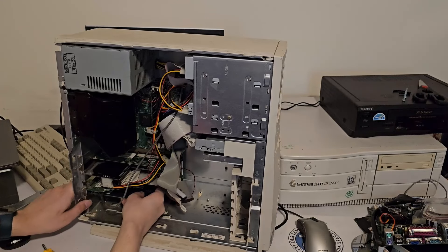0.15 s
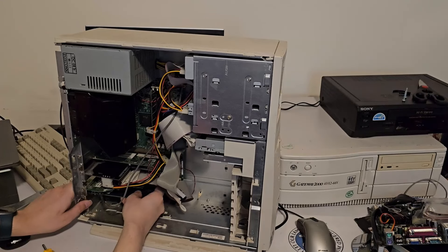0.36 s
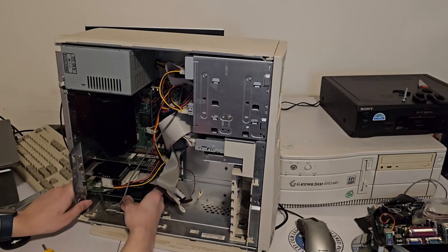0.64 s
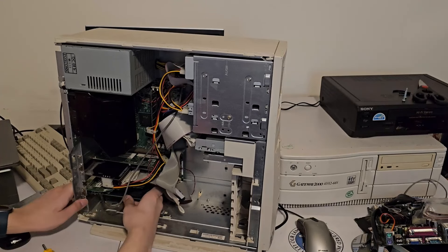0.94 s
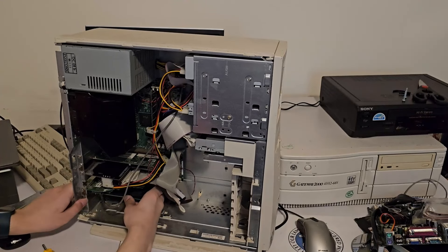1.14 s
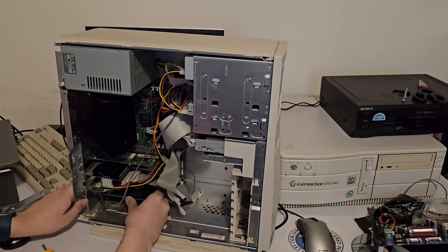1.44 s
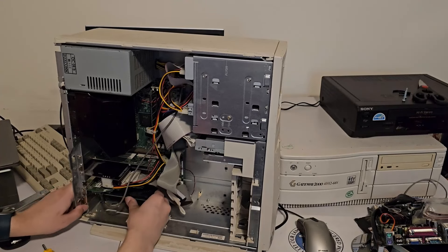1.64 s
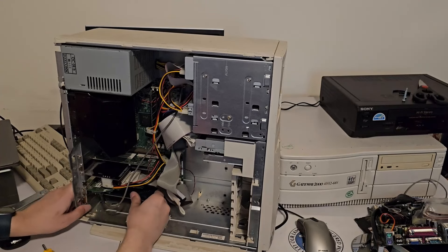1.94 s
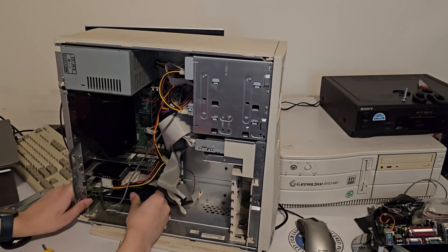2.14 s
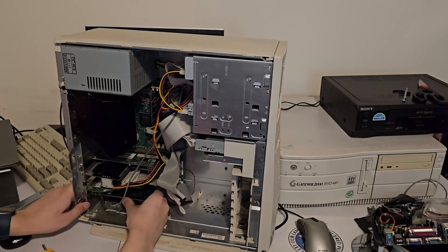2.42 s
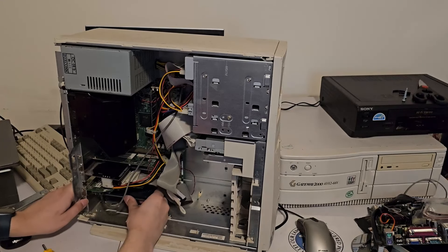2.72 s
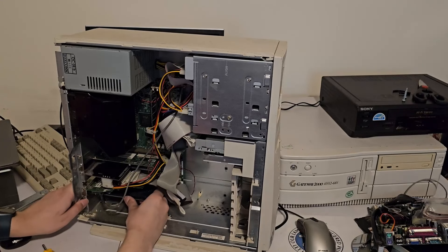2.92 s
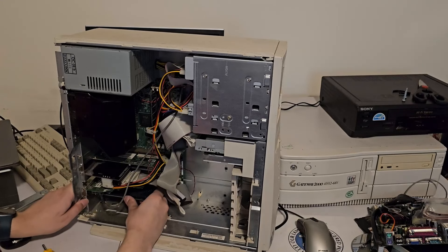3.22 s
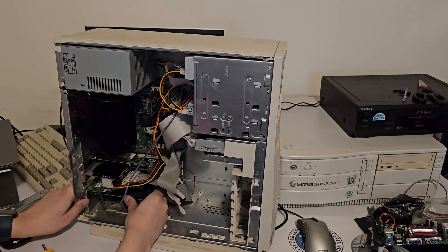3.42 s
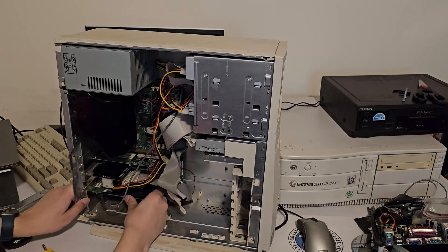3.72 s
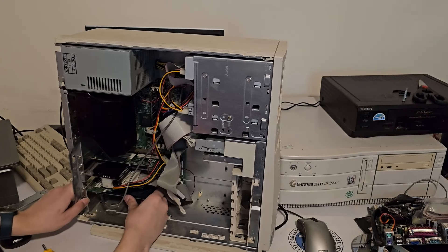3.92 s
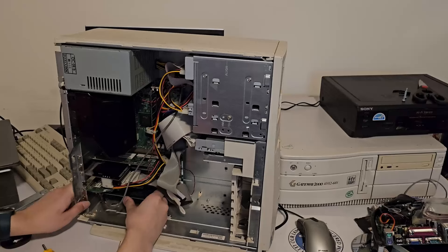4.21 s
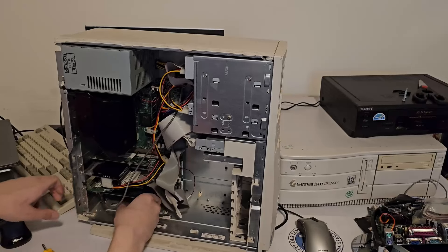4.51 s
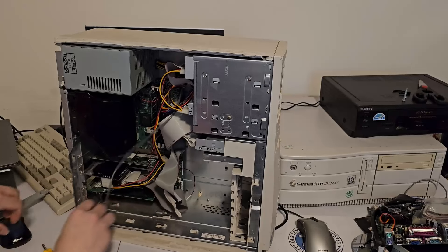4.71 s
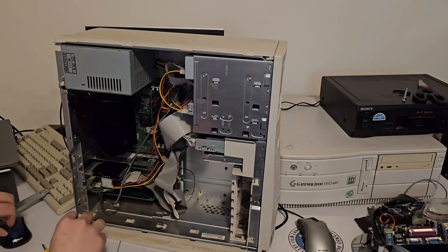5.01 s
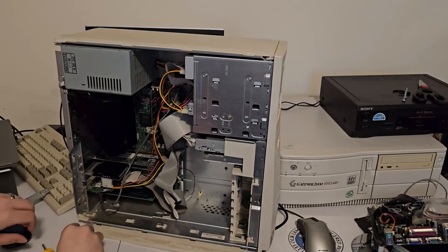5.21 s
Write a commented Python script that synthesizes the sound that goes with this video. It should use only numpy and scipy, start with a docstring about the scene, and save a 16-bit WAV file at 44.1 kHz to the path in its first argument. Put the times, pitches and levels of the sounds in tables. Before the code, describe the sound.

A faint, low room rumble runs throughout, heard in stereo with little echo. At the start a brief soft hiss fades, and a hand rubs and lightly taps an open steel computer case while working an expansion card into place. At about 0.9 seconds the card's metal bracket slips and knocks on the slot frame, with a short ringing clatter of panels and a faint low shudder of the desk. Quiet scuffs of skin and cloth and small ticks follow. The loudest, sharpest knock comes at about 2 seconds, then more faint ticks, a light click at 3.3 seconds and a third hard knock at 3.6 seconds. Between 4.1 and 4.8 seconds there is a cluster of light metallic taps and rubs. At about 5.2 seconds a hollow plastic thing is set down on the desk and rocks with a quick little rattle.

```python
"""A hand works an expansion card into an open steel computer case, heard by two microphones.
A brief hiss fades over a low room rumble; then skin and cloth rub and light taps ring the steel.
At about 0.9, 2 and 3.6 seconds the card's bracket slips and knocks on the slot frame: it bounces,
the panels ring and clatter, and the desk shudders. More rubs and taps follow.
At 5.2 seconds a hollow plastic thing is set down on the desk and rocks."""
import sys
import numpy as np
from scipy import signal
from scipy.fft import rfft, irfft, next_fast_len
from scipy.io import wavfile
from scipy.ndimage import uniform_filter1d

SR = 44100
rng = np.random.default_rng(int(sys.argv[2]) if len(sys.argv) > 2 else 0)


def transcribe(u):
    """Save the signal u as a 16-bit wav file named by the first command-line argument.

    u: samples, shape (n,) or (channels, n), limited to [-1, 1]; the rate is SR.
    q: integer samples, one column per channel.
    """
    v = np.clip(np.atleast_2d(u).T, -1, 1)
    q = np.round(v * 32767).astype(np.int16)
    wavfile.write(sys.argv[1], SR, q)


N = 236067

# Tone colour of the still room: pitch_hz, level_db
RUMBLE_COLOUR = [(12, -8), (30, 0.5), (45, 3), (80, -11.5), (120, -6), (170, -15.5), (240, -12),
                 (310, -25.5), (500, -25), (700, -31), (2000, -32.5), (5200, -36.5), (6300, -45.5),
                 (10000, -53.5), (12500, -49), (16000, -52)]
# A brief fading hiss at the very start, then strokes of skin and cloth:
# peak_s, fall_by_20_db_s, hiss_db, coarse_over_fine_hiss_db, scuff_db
HISS_AND_STROKES = [(0, .03, -77, 7, -65), (.14, .06, -102, 2.5, -69), (.39, 0.18, -71, -6, -93),
                    (0.737, 0.08, -74, 7, -77), (1.276, 0.0949, -60.5, -2.5, -63),
                    (1.438, 0.18, -77.5, -1, -75), (1.557, 0.05, -71, -10, -77),
                    (1.682, 0.05, -71.5, -13, -74.5), (2.17, 0.06, -75.5, 2, -64.5),
                    (2.328, 0.09, -76.5, -5, -80), (2.626, 0.06, -83.5, 5, -80), (2.736, 0.05, -75, 7, -88),
                    (2.898, 0, -85, 5, -82), (3.42, 0.03, -97, 3, -64.5), (3.523, .06, -78, .7, -60.5),
                    (3.878, 0.12, -92, .7, -76.5), (4.205, 0.06, -69, -3, -68),
                    (4.359, 0.08, -61.5, -1.5, -57.5), (4.44, 0.0632, -62, 0.5, -66.5),
                    (4.589, 0.03, -73, -4, -71)]
# Tone colour of skin on metal: pitch_hz, level_db
SKIN_COLOUR = [(1470, -22.5), (2500, -3), (2710, -9), (4590, 3.5), (5960, -1), (8300, 1), (15100, -8),
               (16100, -9.5), (16500, -17)]
# Tone colour of scuffing cloth: pitch_hz, level_db
CLOTH_COLOUR = [(120, -30), (200, -0.5), (420, -13), (534, -1.5), (624, -7), (678, -5), (3500, -24),
                (4550, -35.5), (7700, -120)]
# The five pitch bands of a blow, named body, boom, clack, snap and tick: low_hz, high_hz
BLOW_BANDS = [(400, 1600), (120, 400), (1600, 5500), (5500, 10000), (10000, 17500)]
# Light taps, and the dull low ring swelling again after two hard knocks: start_s, body_db,
# boom_over_body_db, clack_over_body_db, tick_over_body_db, slip_ms, favoured_hz, lift_db
TAPS_AND_SWELLS = [(.013, -62.5, -22, 2, -30, 5.7, 990, 4.5), (.091, -53, -12.5, 4, -26, 1.6, 890, 7.3),
                   (.268, -58, -12, 12, 6.5, 2.05, 1930, 2.5), (.591, -67.5, -19, -18, -32, 2, 1000, 6),
                   (.713, -66, -8, -1, -22, 5.6, 1707, 12), (.843, -59, -16, -34.5, -51, 4.7, 910, 8),
                   (0.867, -53, -7, -22, -48, 9.4, 910, 8), (.885, -54, -8, -12, -22, 16, 910, 6.8),
                   (.943, -47, 7, -25, -28, 3.3, 244, 5.7), (1.04, -62.5, 6, -19, -35, 7.4, 357, 7.7),
                   (1.277, -59.5, -5.5, 5, -12, 2.3, 696, 16), (1.542, -73, -6, -16, -23, 6.1, 865, 4),
                   (1.742, -67.5, -11.5, -6, -35, 4.2, 1210, 23), (2.192, -66, 9, -.7, -26, 6, 245, 12),
                   (2.228, -69.5, 11, -12, -17, 4.3, 244, 13), (2.311, -65, -16, -8.5, -21, 6, 750, 16),
                   (2.498, -68.5, -12, -16, -33, 6, 924, 7.5), (2.622, -68, -10, -3.5, -34, 5.2, 1398, 23),
                   (2.727, -75.5, -2, 5.5, -9, 3.4, 1293, 12), (2.899, -62, -2, -1, -34, 0.59, 1680, 18),
                   (3.336, -52.5, -15, 6.5, -11.5, 2.3, 761, 3.9),
                   (3.513, -61.5, -10, 3.5, -20.5, 12.7, 761, 3), (3.628, -48, 10, -18, -19, 8.8, 244, 9),
                   (4.136, -61.5, -10, -7.5, -28, 0.84, 990, 8.5),
                   (4.202, -56, -15, -6.5, -12, 1.14, 670, 2.6), (4.223, -59.5, -2.5, -18, -23, 3, 670, 3),
                   (4.322, -55, -11, -6.5, -23, 0.75, 670, 3), (4.441, -59.5, -12, -7, -7, 1.6, 750, 6),
                   (4.497, -59, -1.5, -15, -17, 1.2, 760, 7.7),
                   (4.73, -55.5, -6.5, 2, -17, 1.95, 582, 12.5)]
# Modes (natural tones) of the case: pitch_hz, level_db, ring_s (always the time to fade by 60 dB)
CASE_MODES = [(133, -5, 0.17), (199, 0.5, .22), (244.2, 1.5, .15), (287, -9, 0.16), (352, -2, 0.11),
              (406, -9, 0.017), (516, 2.5, .15), (582, -6.5, 0.22), (671, -3, 0.13), (746.4, 1, 0.11),
              (880, -6, 0.12), (904, 1.5, 0.062), (984, 0, 0.12), (1193.5, -9, 0.03), (1302, -8, 0.072),
              (1376, -12, .08), (1485, -8, 0.15), (1690, -5.5, 0.061), (1922, -0.5, 0.13),
              (2111, 1.5, 0.062), (2723, -7.5, 0.035), (3660, -2, 0.066), (4080, -3, 0.069),
              (4700, -5, 0.06), (5260, -3, 0.051), (5520, -1.5, 0.051)]
# Modes too crowded to tell apart, in body and boom: level_over_clear_modes_db, ring_s
CROWDED_MODES = [(-0.5, 0.069), (-5, 0.16)]
# Toneless clatter in clack, snap and tick: sheet_ring_s, room_ring_s, room_share_db
CLATTER_FADES = [(0.048, 0.2, -4), (0.014, 0.24, -2.5), (.02, .17, -4.5)]
# Tone colour of that clatter: pitch_hz, level_db
CLATTER_COLOUR = [(820, -32), (1400, 5.5), (1790, -6), (2100, 1.5), (2450, -6), (2690, -1), (4080, 0),
                  (5010, -3), (5430, -6.5), (6730, -11.5), (8080, -6.5), (10400, -18), (11400, -14.5),
                  (16000, -16.5)]
# Shudders of the desk: start_s, level_db, pitch_hz, ring_s
DESK_SHUDDERS = [(.03, -51, 38.3, 0.96), (0.959, -48.5, 44.13, 1), (2.03, -51, 41.5, 1),
                 (3.639, -50.5, 40, 0.86)]
# Hard knocks of the bracket: start_s, body_db, boom_over_body_db, clack_over_body_db,
# tick_over_body_db, strongest_at_ms, favoured_hz
BRACKET_KNOCKS = [(0.9044, -34.5, -4.5, -1.5, -5.5, 7.4, 244), (1.9623, -25.5, -12.5, 3.5, -2.5, 4.45, 361),
                  (3.581, -29.5, -1.4, -0.5, 2, 7.7, 244)]
# Bounces within a hard knock, ever further apart: delay_ms
BOUNCES_MS = (0, 3.8, 8.7, 15.5, 24)
# The rocking plastic thing touches the desk: start_s, body_db
PLASTIC_TOUCHES = [(5.2205, -59.5), (5.236, -49), (5.248, -45), (5.257, -44), (5.268, -55.5), (5.29, -61)]
# Modes of the plastic thing: pitch_hz, level_db, ring_s
PLASTIC_MODES = [(181, -5, 0.081), (613, -5, 0.12), (676, -1.5, 0.059), (840, -16.5, 0.053),
                 (910, -4, 0.051), (1220, -4, .04), (2095, 10.5, 0.064), (2580, -2, 0.18), (4080, -18, .03)]
# Its balance of bands: boom_over_body_db, clack_over_body_db, tick_over_body_db
PLASTIC_BALANCE = (-21, -4, -32.5)
# How long the room echoes: pitch_hz, ring_s
ROOM_RING = [(100, .28), (300, .2), (1000, .22), (3000, .24)]
# How alike the two microphones hear spread-out sound: pitch_hz, likeness (1 is identical)
LIKENESS = [(60, 0.91), (300, 0.43), (700, 0.23), (1500, 0.27), (3000, 0.13), (12000, 0.011)]
# How much louder the left microphone is: pitch_hz, left_over_right_db
LEFT_TILT = [(100, 1.0), (1000, 1.0), (2000, -.5), (4000, 1.0), (8000, 2.2), (12500, 6.5)]

KNOCK_PING_DB, LIGHT_PING_DB = -13, -7  # clear modes within the clack of hard and of light blows


def gain_of(db):
    """Turns decibels into a factor to multiply by."""
    return 10 ** (np.asarray(db) / 20)


def evened(x):
    """Scales a signal to an average power of 1."""
    return x / np.sqrt(np.mean(x ** 2) + 1e-20)


def read(points, hz):
    """Looks up a table at any pitch, gliding between its rows."""
    pitches, values = np.transpose(points)
    return np.interp(np.log(hz + 1), np.log(pitches + 1), values)


def add(mix, start_s, sound):
    """Adds a sound to the mix at its start time."""
    part = mix[round(start_s * SR):][:len(sound)]
    part += sound[:len(part)]


def wobble(samples):
    """A random drift; more samples make it slower."""
    return evened(uniform_filter1d(rng.standard_normal(N), size=samples))


def partly_alike(left, other, hz):
    """Makes a left and right pair of spectra, most alike in the bass."""
    same = read(LIKENESS, hz)[:, None]
    return np.array([left, same * left + np.sqrt(1 - same ** 2) * other])


def noise(colour, patchy_db, size):
    """Left and right noise of a given tone colour, with drifting louder and softer patches."""
    frames, hz = 4 * N // size + 5, np.fft.rfftfreq(size, 1 / SR)
    a, b, c, d, patches = rng.standard_normal((frames, len(hz), 5)).T
    patches = uniform_filter1d(patches, size=size // 64, axis=0)  # smooth over pitch
    patches = evened(uniform_filter1d(patches, size=6, axis=1))  # and over time
    spectra = partly_alike(a + 1j * b, c + 1j * d, hz)
    spectra *= gain_of(read(colour, hz)[:, None] + patchy_db * patches)
    return evened(signal.istft(spectra, nperseg=size, noverlap=3 * size // 4)[1][:, :N])


def room_rumble():
    """The still room makes a faint, low noise throughout."""
    return gain_of(-64.5) * noise(RUMBLE_COLOUR, patchy_db=1.5, size=2048)


def hiss_and_rubs():
    """A brief hiss fades; then with each stroke skin hisses on metal and cloth adds a duller scuff."""
    t = np.arange(N) / SR
    resting_db = np.array([[-96.5], [-96.5], [-80.5]])  # fine hiss, coarse hiss, scuff
    levels = gain_of(resting_db + 2.5 * wobble(3000))  # the hands are never quite still
    for peak_s, fall_s, hiss_db, coarse_db, scuff_db in HISS_AND_STROKES:
        peaks_db = np.array([[hiss_db], [hiss_db + coarse_db], [scuff_db]])
        fall_db = 20 * (abs(t - peak_s) / fall_s) ** 1.4  # a power of 1 is pointed, 2 is rounded
        levels += gain_of(peaks_db - fall_db)
    grain = gain_of(1.4 * wobble(150))
    hiss = evened(grain * noise(SKIN_COLOUR, patchy_db=2.2, size=256))
    coarse = signal.sosfiltfilt(signal.butter(3, 6020, "lowpass", fs=SR, output="sos"), hiss)
    scuff = noise(CLOTH_COLOUR, patchy_db=2.2, size=512)
    return levels[0] * (hiss - coarse) + levels[1] * coarse + levels[2] * scuff


def favoured(modes, spot_hz, lift_db):
    """The spot that is hit favours one pitch, so modes near it ring louder."""
    return [(hz, db + lift_db * np.exp(-(np.log(hz / spot_hz) / .05) ** 2), ring_s)
            for hz, db, ring_s in modes]


def band_levels(body_db, boom_db, clack_db, tick_db):
    """Levels of a blow's five bands; the snap lies about midway between clack and tick."""
    snap_db = clack_db + .55 * (tick_db - clack_db) - .55
    return body_db + np.array([0, boom_db, clack_db, snap_db, tick_db])


def taps_and_swells():
    """Lists light taps and two swells of low ring as blows; slower slips wake fewer crowded modes."""
    for start_s, *levels_db, slip_ms, spot_hz, lift_db in TAPS_AND_SWELLS:
        crowded_db = -1.5 * np.log2(max(slip_ms, 1))
        modes = favoured(CASE_MODES, spot_hz, lift_db)
        yield start_s, modes, crowded_db, LIGHT_PING_DB, band_levels(*levels_db), slip_ms


def slip(slip_ms):
    """The grip of a slipping contact builds up for slip_ms, then lets go."""
    progress = np.arange(SR // 10) / SR / (slip_ms / 1000)
    return progress * np.exp(1 - progress)


def ring(modes, crowded_db, ping_db, peaks_db, slip_ms):
    """A short slip of tiny touches rings the clear modes and, lower down, the crowded ones between."""
    t = np.arange(SR // 3) / SR
    hz, db, ring_s = np.transpose(modes)
    grip = slip(slip_ms)
    touches = rng.standard_normal(len(grip))
    force = touches * abs(touches) * grip  # uneven, with a few strong touches
    place, bend = rng.standard_normal((2, len(hz)))  # each blow lands elsewhere; the hand bends the sheet
    tones = np.sin(2 * np.pi * hz * (1 + .02 * bend) * t[:, None])
    tones *= gain_of(db + 2.5 * place - 60 * t[:, None] / ring_s)
    hiss, out = rng.standard_normal(len(t)), np.zeros(len(t))
    for k, peak_db in enumerate(peaks_db[:3] + [0, 0, ping_db]):  # body, boom, clack
        low, high = BLOW_BANDS[k]
        band = signal.butter(3, (low, high), "bandpass", fs=SR, output="sos")
        clear = signal.fftconvolve(force, tones[:, (hz > low) & (hz <= high)].sum(axis=1))[:len(t)]
        sound = evened(signal.sosfilt(band, clear))
        if k < len(CROWDED_MODES):
            share_db, crowded_ring_s = CROWDED_MODES[k]
            power = signal.fftconvolve(grip ** 2, gain_of(-120 * t / crowded_ring_s))[:len(t)]
            crowded = signal.sosfilt(band, hiss * np.sqrt(abs(power)))
            sound += gain_of(share_db + crowded_db) * evened(crowded)
        loudest = np.sqrt(uniform_filter1d(sound ** 2, size=300).max())
        out += gain_of(peak_db) * sound / loudest
    return out


def fade(power, ring_s):
    """Spreads power into a dying tail with the same total."""
    kept = 10 ** (-6 / (ring_s * SR))
    return signal.lfilter([1 - kept], [1, -kept], power)


def clatter(blows):
    """The toneless treble of all blows comes straight from the struck sheet and scattered by the room."""
    near = noise(CLATTER_COLOUR, patchy_db=3.0, size=256)[0]
    far = noise(CLATTER_COLOUR, patchy_db=3.9, size=256)
    grit = gain_of(1.5 * wobble(30))  # single touches stand out
    straight, scattered = np.zeros(N), np.zeros((2, N))
    for k, (sheet_ring_s, room_ring_s, share_db) in enumerate(CLATTER_FADES, start=2):
        power = np.zeros(N)
        for start_s, *_, peaks_db, slip_ms in blows:
            rattle = fade(slip(slip_ms) ** 2, sheet_ring_s)
            add(power, start_s, gain_of(2 * peaks_db[k]) * rattle / rattle.max())
        band = signal.butter(4, BLOW_BANDS[k], "bandpass", fs=SR, output="sos")
        straight += np.sqrt(power) * evened(grit * signal.sosfilt(band, near))
        echo = fade(fade(power, room_ring_s), 0.018)  # the walls take a few ms to answer
        scattered += gain_of(share_db) * np.sqrt(echo) * evened(signal.sosfilt(band, far))
    return straight, scattered


def room_echo(sound):
    """Many reflections blur into a tail in which each pitch dies at its own speed."""
    hz, t = np.fft.rfftfreq(512, 1 / SR), np.arange(180) * 128 / SR
    a, b, c, d = rng.standard_normal((4, len(hz), len(t)))
    ring_s = read(ROOM_RING, hz)[:, None]
    decay = gain_of(-60 * t / ring_s) / np.sqrt(ring_s)
    tail = signal.istft(partly_alike(a + 1j * b, c + 1j * d, hz) * decay, nperseg=512, noverlap=384)[1]
    tail *= 1 - np.exp(-np.arange(tail.shape[1]) / SR / .004)  # the first walls are a few ms away
    return signal.fftconvolve(sound[None], tail / np.linalg.norm(tail[0]), axes=1)[:, :N]


def desk_shudders():
    """One low mode of the desk top swells for a few cycles and dies."""
    out, t = np.zeros(N), np.arange(SR // 2) / SR
    swell = 1 - np.exp(-t / 0.022)
    for start_s, level_db, hz, ring_s in DESK_SHUDDERS:
        add(out, start_s, gain_of(level_db - 60 * t / ring_s) * swell * np.sin(2 * np.pi * hz * t))
    return out


def bracket_knocks():
    """Lists the bracket's hard blows on the frame: each knock is a run of bounces that grow and die."""
    grow_db_per_ms = np.array([.83, .83, 1.6, 1.6, 1.6])  # one value for each band
    die_db_per_ms = np.array([.83, .83, 1.2, 1.2, 1.2])
    late_ms = np.array([4.5, 0, 0, 0, 0])  # the body rings hardest a little after the rest
    crowded_db, slip_ms = 0, 1.1
    for start_s, *levels_db, strongest_ms, spot_hz in BRACKET_KNOCKS:
        modes = favoured(CASE_MODES, spot_hz, lift_db=9)
        for delay_ms in BOUNCES_MS:
            after_ms = delay_ms - strongest_ms - late_ms
            drop_db = np.maximum(-grow_db_per_ms * after_ms, die_db_per_ms * after_ms)
            peaks_db = band_levels(*levels_db) - drop_db
            yield start_s + delay_ms / 1000, modes, crowded_db, KNOCK_PING_DB, peaks_db, slip_ms


def plastic_set_down():
    """Lists the quick blows of a hollow plastic thing rocking on the desk."""
    modes = favoured(PLASTIC_MODES, spot_hz=637, lift_db=8.5)
    crowded_db, slip_ms = -13, 2.76
    for start_s, body_db in PLASTIC_TOUCHES:
        yield start_s, modes, crowded_db, LIGHT_PING_DB, band_levels(body_db, *PLASTIC_BALANCE), slip_ms


def scene():
    """Mixes all the sounds; blows reach the left microphone first, then the room answers."""
    blows = [*bracket_knocks(), *taps_and_swells(), *plastic_set_down()]
    ringing = np.zeros(N)
    for start_s, *blow in blows:
        add(ringing, start_s, ring(*blow))
    straight, scattered = clatter(blows)
    left = ringing + straight
    size, right_lag_s = next_fast_len(N + 64), 1.4e-4
    delay = np.exp(-2j * np.pi * np.fft.rfftfreq(size, 1 / SR) * right_lag_s)
    right = irfft(rfft(left, size) * delay, size)[:N]
    room = room_rumble() + scattered + gain_of(-5) * room_echo(ringing)
    return np.array([left, right]) + room + desk_shudders() + hiss_and_rubs()


def record(dry):
    """The left microphone hears more treble, and the very highest pitches are cut from both."""
    size, cutoff_hz = next_fast_len(N + 1024), 15850
    tilt_db = read(LEFT_TILT, np.fft.rfftfreq(size, 1 / SR)) / 2
    tilted = irfft(rfft(dry, size) * gain_of([tilt_db, -tilt_db]), size)[:, :N]
    lowpass = signal.firwin(255, cutoff_hz, window=("kaiser", 9), fs=SR)
    return signal.oaconvolve(tilted, lowpass[None], "same")


dry = scene()
out = record(dry)
transcribe(out)
```